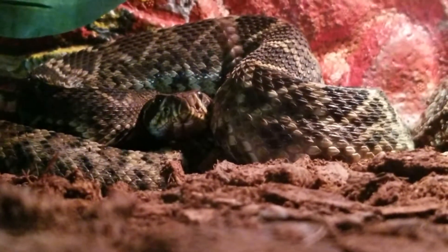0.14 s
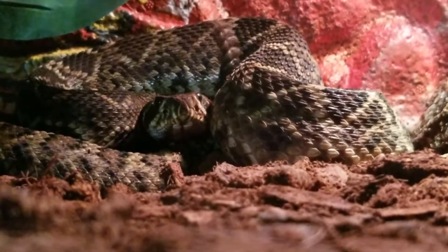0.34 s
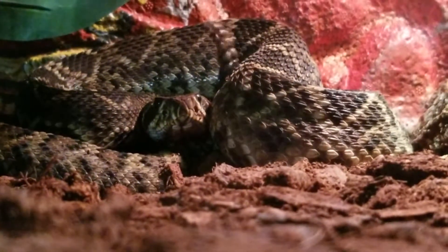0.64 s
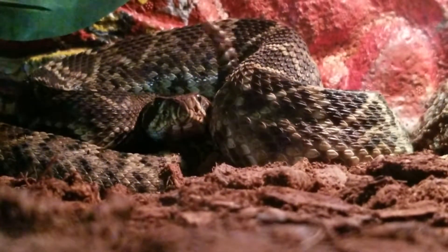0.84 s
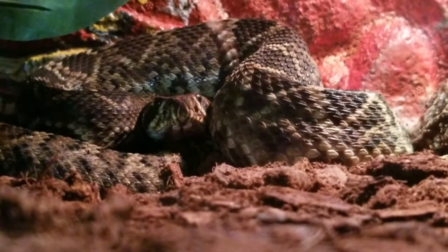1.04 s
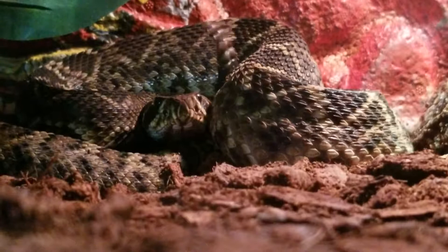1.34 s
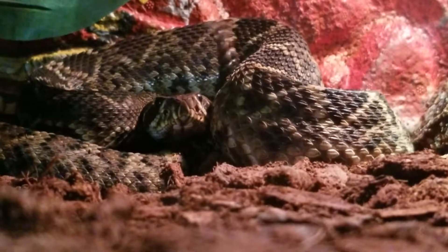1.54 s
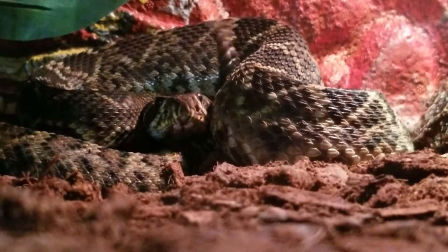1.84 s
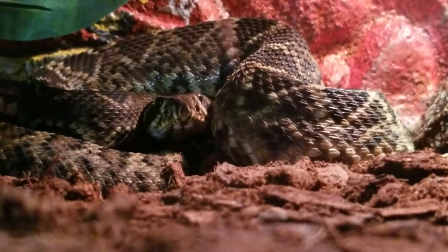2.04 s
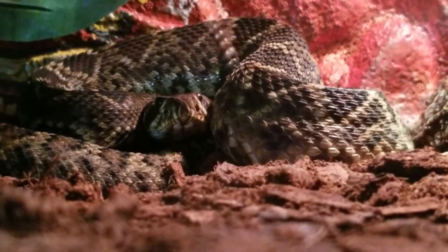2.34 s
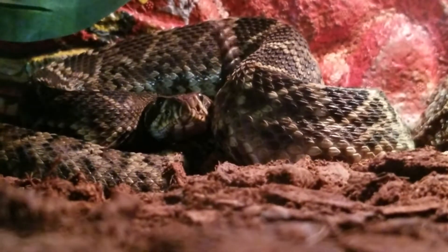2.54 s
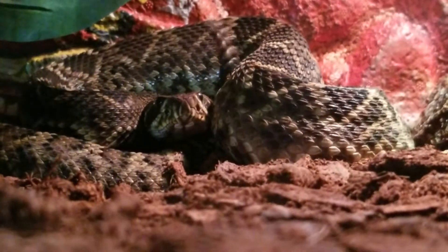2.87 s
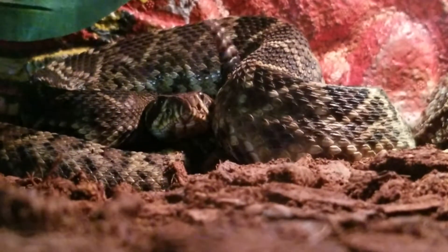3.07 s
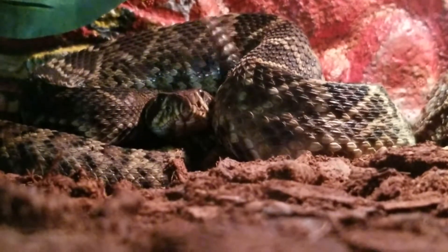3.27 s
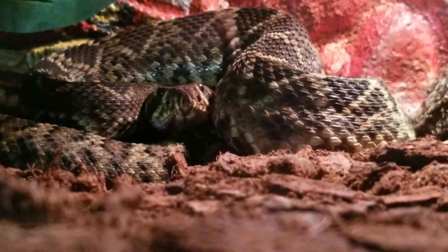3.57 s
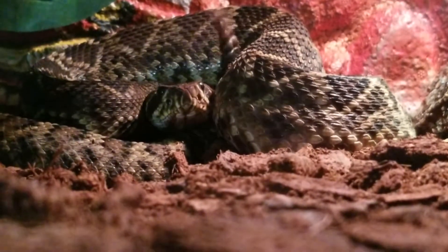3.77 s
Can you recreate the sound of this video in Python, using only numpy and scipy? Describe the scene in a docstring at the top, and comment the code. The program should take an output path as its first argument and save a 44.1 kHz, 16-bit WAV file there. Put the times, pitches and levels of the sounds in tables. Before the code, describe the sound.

A rattlesnake shakes its tail in a continuous, bright, throbbing buzz inside a small enclosure.

```python
"""Rattlesnake in a terrarium

A rattlesnake buzzes its tail about 100 times a second inside a small hard-walled terrarium.
Each swing knocks the loose horny segments together; on about every fifth they slam, so the hiss throbs.
The enclosure echoes briefly and rings. Sharp knocks and soft shuffles are heard as thuds and small contacts.
Behind them are a low room rumble, made of filtered noise, and a passing hum, a sine of wavering phase."""
import sys
import numpy as np
from scipy import signal
from scipy.fft import rfft, irfft, next_fast_len
from scipy.io import wavfile
from scipy.ndimage import uniform_filter1d, map_coordinates

SR = 44100
rng = np.random.default_rng(int(sys.argv[2]) if len(sys.argv) > 2 else 0)


def unload_audio(sound):
    """Save the sound as a 16-bit wav file, at the path given as the first command line argument."""
    columns = np.transpose(np.atleast_2d(sound))
    # keep every value between -1 and 1, then stretch to whole-number steps
    steps = np.round(np.clip(columns, -1, 1) * 32767)
    wavfile.write(sys.argv[1], SR, steps.astype(np.int16))


N = 172431  # length in samples

# Spectrum of small hard contacts. Each row: frequency in Hz, level in dB.
CONTACT_SPECTRUM = [(80, -22), (200, 1), (380, -1), (550, -8.5), (750, -7), (1200, -5), (2200, -3),
                    (4000, -7), (9000, -33)]


def amp(db):
    """Level law: decibels to amplitude gain."""
    return 10 ** (np.asarray(db) / 20)


def unit(x):
    """Normalisation: scale to rms 1."""
    return x / np.sqrt(np.mean(x ** 2) + 1e-20)


def along(points, hz):
    """Spectral envelope: (Hz, value) points joined on a logarithmic frequency axis."""
    f, v = np.transpose(points)
    return np.interp(np.log(hz + 1), np.log(f + 1), v)


def curve(rows):
    """Temporal envelope: (s, value) points joined by lines, one value per sample."""
    return np.interp(np.arange(N) / SR, *np.transpose(rows))


def wobble(rate):
    """Slow random modulation: a smooth curve through `rate` random knots a second."""
    knots = rng.standard_normal(int(N * rate / SR) + 4)
    return map_coordinates(knots, [np.arange(N) * rate / SR])


def dying(t, t60):
    """Exponential decay: the amplitude falls by 60 dB in t60 seconds."""
    return np.exp(-np.log(1000) * t / t60)


def coloured(x, gain):
    """Minimum-phase filtering: folding the cepstrum makes the given gain of frequency causal."""
    m = 2 * next_fast_len(N)
    log_gain = np.log(np.maximum(gain(np.fft.rfftfreq(m, 1 / SR)), 1e-6))
    cepstrum = irfft(log_gain, m)
    fold = 1 + np.sign(m // 2 - np.arange(m))
    fold[0] = 1
    response = np.exp(rfft(cepstrum * fold))
    return irfft(rfft(x, m) * response, m)[..., :N]


def rush(spectrum):
    """Partly coherent stereo noise of rms 1: the channels are nearly alike in the bass."""
    # Each row: frequency in Hz, correlation of left with right.
    likeness = [(40, 0.99), (120, 0.89), (300, 0.72), (1000, 0.39), (4000, 0.3)]
    m = next_fast_len(N)
    hz = np.fft.rfftfreq(m, 1 / SR)
    turn = np.arccos(np.clip(along(likeness, hz), -1, 1)) / 2
    white = rfft(rng.standard_normal((2, m)))
    shaped = white * amp(along(spectrum, hz))
    mid, side = irfft(shaped * [np.cos(turn), np.sin(turn)])[:, :N]
    return unit(np.array([mid + side, mid - side]))


def patchy(x, depth_db):
    """Random modulation in time and frequency: each narrow band of x swells and fades."""
    z = signal.stft(x, nperseg=2048)[2]
    field = rng.standard_normal(z.shape[1:])
    field = uniform_filter1d(field, size=3, axis=0)  # across bands
    field = uniform_filter1d(field, size=6, axis=1)  # across time
    return unit(signal.istft(z * amp(depth_db * unit(field)))[1][:, :N])


def rattle():
    """Shared excitation: the same swings throw all segments, each with its own spot and spectral share."""
    # Level of the rattle as the shaking varies. Each row: time in seconds, level in dB before rattle_db.
    effort = [(0, -41), (.15, -42.5), (.4, -40.5), (.52, -43), (.7, -43), (1.05, -42), (1.3, -44.5),
              (1.5, -43), (2.0, -43), (2.5, -44.5), (2.7, -44.5), (3.2, -43), (3.45, -43), (3.65, -42),
              (3.9, -42.5)]
    # Colour of the rattle. Each row: frequency in Hz, level in dB.
    shell_colour = [(100, -57), (600, -45.5), (1300, -33), (2150, -30), (2550, -15.5), (2850, -15),
                    (3050, -12.5), (3500, -9.5), (4000, -10), (4600, -6.5), (5300, -2.5), (6100, -1),
                    (7000, -2), (7800, -0.5), (8600, -5.5), (9400, -2), (10200, -4.5), (10950, 0),
                    (11900, -6), (12400, -1), (13500, -13), (14200, -16), (15000, -4), (15700, -6)]
    # Stereo balance of the rattle. Each row: frequency in Hz, left minus right of its colour in dB.
    lean = [(2200, 0), (3000, 1.5), (3500, 6), (4300, 2), (5200, 0.5), (6100, 0), (7000, 6.5), (7600, 1.5),
            (8100, -4), (8700, 2.5), (10400, 1.5), (11500, 1.5), (14000, -0.5), (15500, -0.5)]
    # Where each hollow segment rings most, in Hz.
    segment_hz = [2900, 4830, 5500, 6720, 7930, 11200, 11500, 14000]
    rattle_db = 2.5
    width_octaves, skirt_db = 0.17, -17  # shape of each segment's resonance
    drift_db, drift_per_s = 1.8, 7  # slow level change of the deepest segment

    turns, m = swings(), next_fast_len(N)
    octaves = np.log2((np.fft.rfftfreq(m, 1 / SR) + 1) / np.array(segment_hz)[:, None])
    shares = amp(skirt_db) + np.exp(-.5 * (octaves / width_octaves) ** 2)
    shares /= np.linalg.norm(shares, axis=0)  # the powers add to a flat spectrum
    placed = []
    for share in shares:
        clacks = rfft(segment(*turns, count=22), m)
        placed.append(terrarium(irfft(clacks * share, m)[:N]))
    deepest, *others = placed
    chain = deepest * amp(drift_db * wobble(drift_per_s)) + sum(others)

    def shell(hz):
        """Filtering by the shell: one colour, tilted oppositely to left and right."""
        return amp(along(shell_colour, hz) + np.outer([.5, -.5], along(lean, hz)))

    return amp(rattle_db + curve(effort)) * unit(coloured(chain, shell))


def swings():
    """Periodic forcing: time, dB and spread of each tail turn; a tight slam, a rebound, swings, light returns."""
    # Runs of even shaking, each opening with a slam.
    # Each row: start in seconds, slam level in dB over a plain swing.
    runs = [(0.009, 3), (.136, 2.5), (.421, 2), (.527, 3.5), (.664, 2.5), (1.056, 3.5), (1.154, 4),
            (1.427, 1), (1.468, 4), (1.524, 4), (1.909, 3.5), (2.067, 3.5), (2.203, 4), (2.262, 4),
            (2.799, 4), (2.954, 3.5), (2.995, 4.5), (3.086, 2.5), (3.191, 3), (3.231, 3.5), (3.565, 2),
            (3.654, 3), (3.891, 3.5)]
    # Single slams that replace the nearest turn.
    # Each row: time in seconds, level in dB relative to a plain swing.
    single_slams = [(0.096, -1), (.186, 7.5), (.284, 5), (0.38, -1.5), (0.712, 4.5), (0.861, 5),
                    (0.956, 3.5), (1.154, 6), (1.203, 5), (1.251, 5.5), (1.398, 7.5), (1.524, 4), (1.67, 4),
                    (1.822, 4.5), (1.869, 6.5), (2.008, 5.5), (2.361, 6.5), (2.560, 8), (2.659, 5.5),
                    (2.710, 6.5), (2.801, 6.5), (2.897, 3), (2.995, 4), (3.044, 4), (3.429, 6.5),
                    (3.478, 3), (3.524, 3.5), (3.703, 5.5), (3.752, 1.5)]
    swing_hz, swings_per_slam = 101.3, 5
    rebound_db, return_db = 1.7, -4.5
    slam_spread_s, clack_spread_s = .001, .0013
    jitter_s, scatter_db = .0004, .5

    turns = []
    ends = [run[0] for run in runs[1:]] + [N / SR]
    for (start, slam_db), end in zip(runs, ends):
        whole = max(1, round((end - start) * swing_hz))
        k = np.arange(2 * whole) / 2  # swing count; halves are the returns
        # a run ends in a lull
        since = np.where(k < whole - 1, k % swings_per_slam, swings_per_slam - 1)
        fade_db = -0.02 + 0.21 * slam_db  # per swing: hard slams leave deeper lulls
        level = slam_db * (since == 0) + rebound_db * (since == 1)
        level = level - fade_db * since + return_db * (k % 1 > 0)
        spread = np.where(since == 0, slam_spread_s, clack_spread_s)
        turns.append([start + (end - start) * k / whole, level, spread])
    s, db, spread = np.hstack(turns)
    late, size = rng.standard_normal((len(s), 2)).T
    s, db = s + jitter_s * late, db + scatter_db * size
    for when, slam_db in single_slams:
        turn = np.argmin(np.abs(s - when))
        s[turn], db[turn], spread[turn] = when, slam_db, slam_spread_s
    return s, db, spread


def segment(s, db, spread, count):
    """Impact and friction: a loose segment gives `count` ticks at every turn and scrapes in between."""
    delay_s, lag_s = 0.0015, .0003  # common delay, and scatter of each cluster's lag
    cluster_scatter_db, tick_scatter_db, scrape_db = 1.5, 2.5, -13

    scrape = rng.standard_normal(N)
    late, size, sign = (rng.standard_normal((len(s), count)) for _ in range(3))
    lag, catch = rng.standard_normal((2, len(s)))
    when = (s + delay_s + lag_s * lag)[:, None] + spread[:, None] * late
    force_db = (db + cluster_scatter_db * catch)[:, None] + tick_scatter_db * size
    force = np.sign(sign) * amp(force_db)
    ticks = np.bincount(np.abs(when * SR).astype(int).ravel(), force.ravel(), N)[:N]
    scrape = scrape * amp(curve(np.c_[s + delay_s, db]))
    return unit(ticks) + amp(scrape_db) * unit(scrape)


def terrarium(x):
    """Room response from one spot: direct sound, near walls, an echo whose treble dies first, standing waves."""
    # Ringing of the enclosure. Each row: frequency in Hz, level in dB before mode_db.
    tank_modes = [(4973, -6), (5303, -3), (5429, 0), (5695, -4), (5740, -3), (5816, -1), (5973, -3),
                  (6043, -3), (6117, 0), (6220, -3), (6476, -4), (6572, -3), (6730, -2), (7524, -3),
                  (7594, -4), (7976, -3), (9115, -3)]
    mode_t60_s, mode_db, mode_right_db = 0.12, -34, -20.5  # right relative to left
    echo_t60_s, treble_t60_s, split_hz = 0.11, 0.055, 9000
    echo_db, first_wall_s = 1.5, 0.00062
    near_db, near_t60_s = -4, .008

    t = np.arange(SR // 4) / SR
    noise = rng.standard_normal((2, len(t)))
    low = irfft(rfft(noise) * (np.fft.rfftfreq(len(t), 1 / SR) < split_hz), len(t))
    echo = low * dying(t, echo_t60_s) + (noise - low) * dying(t, treble_t60_s)
    echo = echo * (t > first_wall_s)
    answer = amp(echo_db) * echo / np.linalg.norm(echo, axis=1, keepdims=True)
    near = rng.standard_normal((2, len(t))) * dying(t, near_t60_s)
    answer += amp(near_db) * near / np.linalg.norm(near, axis=1, keepdims=True)
    answer[:, 0] += 1  # direct sound
    ring = 0
    for hz, db in tank_modes:
        ring = ring + amp(db + mode_db) * np.sin(2 * np.pi * (hz * t + rng.random((2, 1))))
    answer += ring * dying(t, mode_t60_s) * np.array([[1], [amp(mode_right_db)]])
    return signal.fftconvolve(x[None], answer, axes=1)[:, :N]


def knocks():
    """Impulse response: each knock is a sharp click with a short diffuse tail, over a thud of a few cycles."""
    # Each row: time in seconds, level of the low thud in dB, peak of the click before its tail in dB,
    # top of the click in Hz.
    knock_rows = [(0.145, -35.5, -35.5, 4500), (.463, -58, -54, 1400), (2.526, -68, -55.5, 1200),
                  (2.565, -70, -55, 1410), (2.644, -70, -51.5, 1300), (2.657, -61, -52.5, 604)]
    thud_hz, thud_t60_s = 112, 0.025
    tail_db, tail_t60_s = 1, .06

    t, out = np.arange(N) / SR, np.zeros((2, N))
    click = coloured(1.0 * (t == 0), lambda hz: amp(along(CONTACT_SPECTRUM, hz)))[:SR // 4]
    t = t[:len(click)]
    thud = np.sin(2 * np.pi * thud_hz * t) * dying(t, thud_t60_s)
    for s, thud_db, click_db, top_hz in knock_rows:
        dulled = signal.sosfilt(signal.butter(2, top_hz, fs=SR, output="sos"), click)
        tail = rng.standard_normal((2, len(t))) * dying(t, tail_t60_s)
        answer = (t == 0) + amp(tail_db) * tail / np.linalg.norm(tail[0])
        heard = signal.fftconvolve(dulled[None] / np.abs(dulled).max(), answer, axes=1)[:, :len(t)]
        out[:, round(s * SR):][:, :len(t)] += amp(thud_db) * thud - amp(click_db) * heard
    return out


def shuffles():
    """Enveloped noise: each shuffle is a low thud under a rough, low-passed cluster of small contacts."""
    # Each row: start in seconds, low thud in dB, scuff in dB, top of the scuff in Hz,
    # rise in seconds, 60 dB decay time in seconds.
    shuffle_rows = [(.158, -59, -60.5, 1200, 0.0076, 0.15), (.19, -82, -59.5, 3500, 0.011, 0.099),
                    (.331, -74, -66, 600, 0.0027, 0.13), (1.309, -78, -67, 880, 0.0055, 0.23),
                    (1.535, -56.5, -70, 404, 0.017, 0.28), (2.272, -53.5, -58.5, 1710, 0.011, 0.23),
                    (2.304, -72, -68.5, 1700, 0.0079, 0.24), (2.40, -57, -74, 398, 0.016, 0.17),
                    (2.662, -70, -69, 1300, 0.0094, 0.088)]
    # Spectrum of the low thud. Each row: frequency in Hz, level in dB.
    thud_spectrum = [(20, -27), (45, 11), (80, 18), (150, 9), (260, -11.5), (600, -30), (2000, -80)]
    contacts_per_s, contact_scatter_db = 260, 3.5

    thud, out = rush(thud_spectrum), np.zeros((2, N))
    scuff = rush(CONTACT_SPECTRUM) * amp(contact_scatter_db * wobble(contacts_per_s))
    for s, thud_db, scuff_db, top_hz, rise, t60 in shuffle_rows:
        t = np.maximum(np.arange(N) / SR - s, 0)
        shape = np.minimum(t / rise, 1) * dying(np.maximum(t - rise, 0), t60)
        dulled = unit(signal.sosfilt(signal.butter(2, top_hz, fs=SR, output="sos"), scuff))
        out += shape * (amp(thud_db) * thud + amp(scuff_db) * dulled)
    return out


def room():
    """Modulated noise and phase modulation: a rumble whose weight wanders in frequency, and a wavering low hum."""
    # Spectrum of the rumble, then its upper end. Each row: frequency in Hz, level in dB.
    room_spectrum = [(20, -4.5), (32, -15), (45, 7), (70, 1.5), (115, 2), (160, -7), (200, -18.5),
                     (300, -14.5), (450, -23), (650, -25), (1500, -29.5)]
    room_top = [(3000, -36), (15000, -37.5)]
    # Each row: time in seconds, level of the rumble in dB before trim_db and the random swell.
    rumble_levels = [(0.0, -59), (0.48, -63), (0.77, -64.5), (1.14, -64), (1.69, -63.5), (2.07, -67.5),
                     (2.44, -64), (2.7, -65), (3.14, -65), (3.91, -64)]
    # Each row: time in seconds, level of the hum in dB.
    hum_levels = [(0, -78), (2.85, -76.5), (3.0, -59), (3.13, -63.5), (3.25, -75), (3.38, -61.5),
                  (3.5, -70.5), (3.66, -60), (3.8, -78)]
    trim_db, swell_db, swells_per_s, patchy_db = 0.5, 2.3, 4.96, 2.5
    hum_hz, waver_rad, wavers_per_s = 116, 1.22, 5

    air = patchy(rush(list(room_spectrum) + room_top), patchy_db)
    rumble = amp(curve(rumble_levels) + trim_db + swell_db * wobble(swells_per_s)) * air
    phase = 2 * np.pi * hum_hz * np.arange(N) / SR + waver_rad * wobble(wavers_per_s)
    hum = unit(np.sin(phase))
    return rumble + amp(curve(hum_levels)) * hum


def scene():
    """Superposition: the snake over the sounds of the room."""
    return rattle() + room() + knocks() + shuffles()


def record(dry):
    """Band limiting: nothing passes at or above the top frequency."""
    top_hz = 15800
    m = next_fast_len(N + SR // 2)
    return irfft(rfft(dry, m) * (np.fft.rfftfreq(m, 1 / SR) < top_hz), m)[:, :N]


dry = scene()
out = record(dry)
unload_audio(out)
```